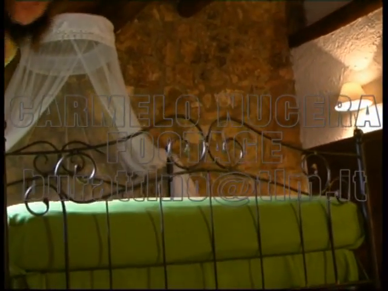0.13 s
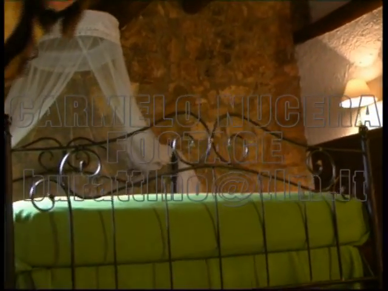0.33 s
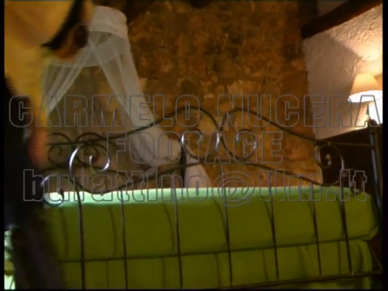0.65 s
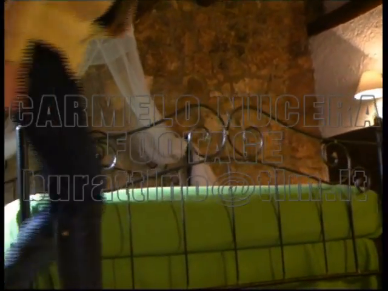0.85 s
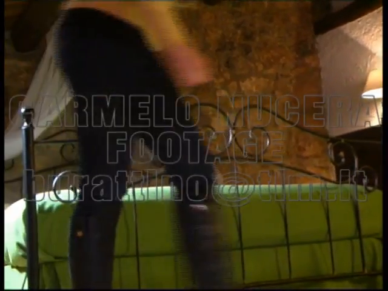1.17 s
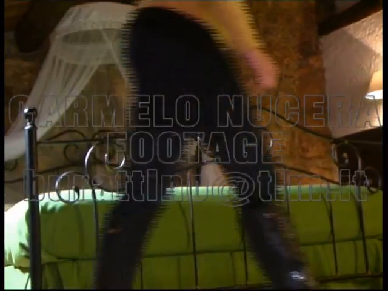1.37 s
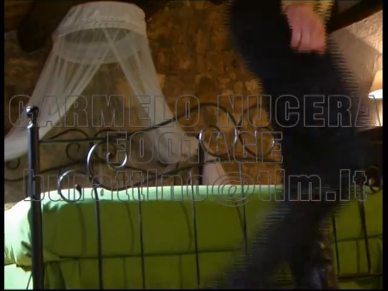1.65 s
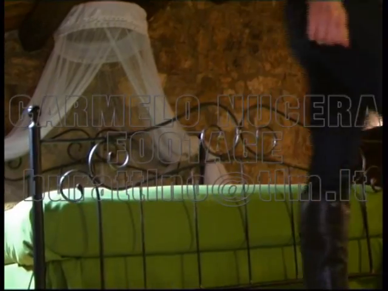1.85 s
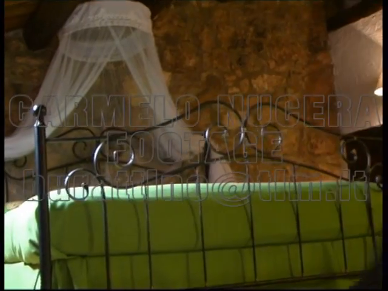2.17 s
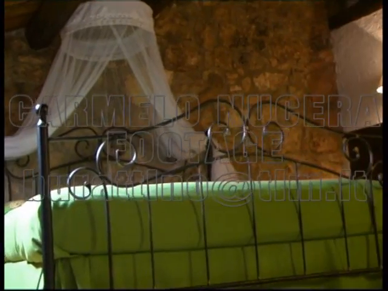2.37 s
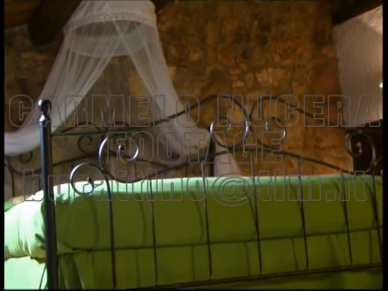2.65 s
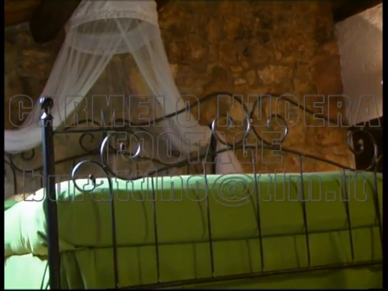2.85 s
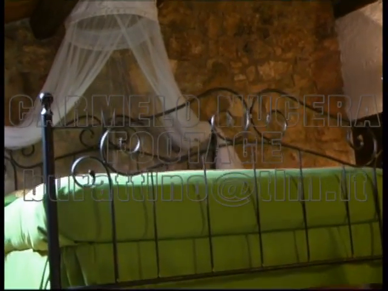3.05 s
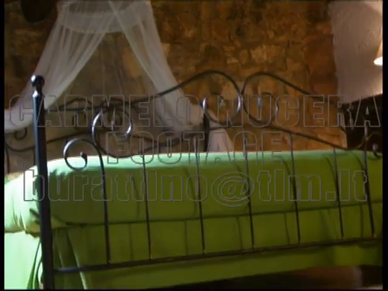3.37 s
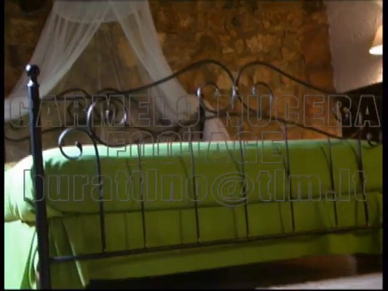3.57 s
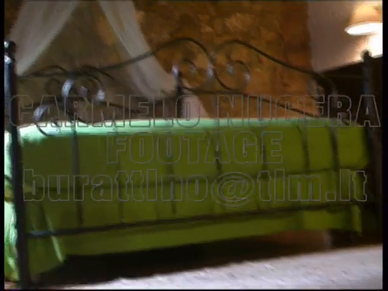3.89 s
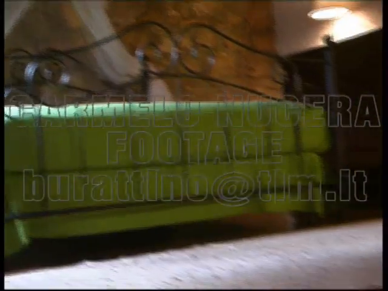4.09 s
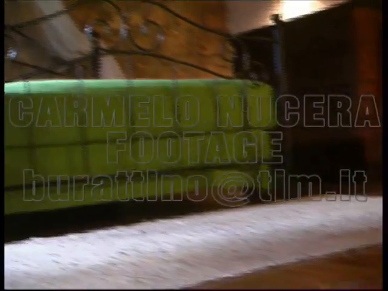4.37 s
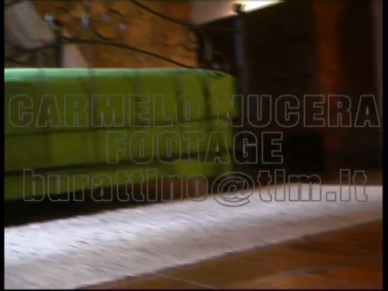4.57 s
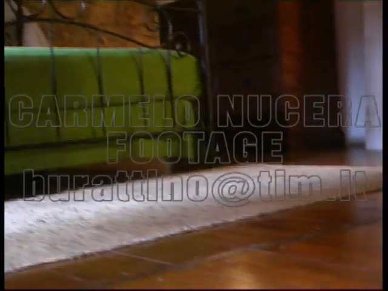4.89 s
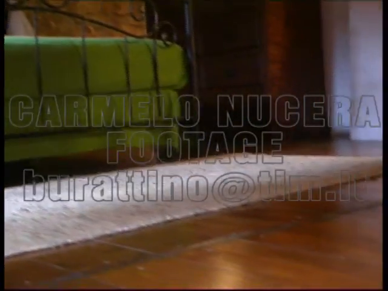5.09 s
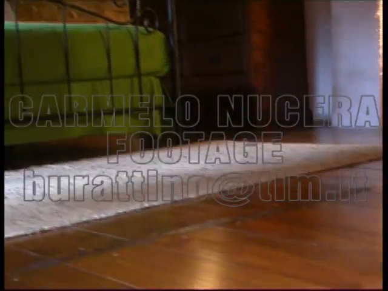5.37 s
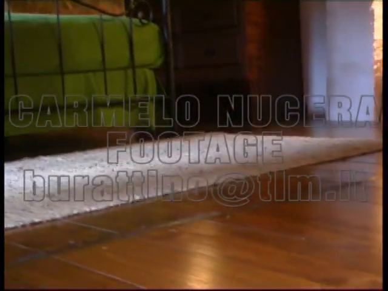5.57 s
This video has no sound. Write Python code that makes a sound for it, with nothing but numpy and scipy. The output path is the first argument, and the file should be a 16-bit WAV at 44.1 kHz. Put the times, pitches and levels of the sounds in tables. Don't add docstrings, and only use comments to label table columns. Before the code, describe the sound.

Slow, uneven boot steps knock on a resonant wooden floor in a live stone room. Early steps shuffle and jingle slightly; the strongest thump and clatter arrives around 2.3 seconds, followed by firm knocks near 3 and 3.7. Later steps are weaker, with scuffs and dull handling bumps at the end. A nearby camera microphone also picks up steady hum and hiss.

```python
import sys
import numpy as np
from scipy import signal
from scipy.fft import rfft, irfft
from scipy.io import wavfile
from scipy.ndimage import map_coordinates

SR = 44100
rng = np.random.default_rng(int(sys.argv[2]) if len(sys.argv) > 2 else 0)


def invert_db(level):
    return 10 ** (np.asarray(level, dtype=float) / 20)


def waveform_to_disk(signal):
    frames = np.transpose(np.atleast_2d(signal))
    scaled = np.clip(frames, -1, 1) * 32767
    samples = np.round(scaled).astype(np.int16)
    wavfile.write(sys.argv[1], SR, samples)


N = 253134
ROOM_RING = 26000

# (pitch [Hz], level [dB])
HUM_TONES = [(150.6, -46), (15622, -100)]
# (frequency [Hz], level per Hz [dB])
AIR_COLOUR = [(20, -44), (60, 9.5), (105, 12), (140, 9.5), (200, 1), (340, -5), (1300, -13), (3000, -15.5),
              (6900, -19), (12400, -25.5), (15700, -30.5)]
# (frequency [Hz], likeness [0-1])
AIR_LIKENESS = [(30, 0.85), (100, 0.9), (300, 0.2), (3000, 0.17), (10500, 0.1), (12300, 0.95)]
# (frequency [Hz], time to fall 60 dB [s])
ROOM_DECAY = [(60, 1), (150, 0.64), (400, 0.65), (1500, 0.48), (4000, 0.33), (10000, 0.19)]
# (frequency [Hz], likeness [0-1])
ROOM_LIKENESS = [(80, 0.88), (170, 0.53), (270, 0.27), (600, 0.46), (2000, 0.028), (10500, 0.39),
                 (12500, 0.29)]
# (delay [s], level [dB])
WALL_ECHO = (.0052, -8.5)
# (time [s], left over right [dB])
WALK_PATH = [(0.0, 2), (1.69, 2.5), (1.95, 7), (2.1, -5), (2.86, -4.5), (5.74, 5.5)]

# (time [s], peak level [dB], deep ring [dB], high knock [dB])
CAMERA_BUMPS = [
    (2.178, -53.5, 17, -29),
    (5.387, -39.5, 8.5, -29),
    (5.435, -43.5, -8, -27),
    (5.508, -47.5, 6, -24),
    (5.706, -42, 9.5, -20),
]
# (pitch [Hz], width [Hz])
CASING_MODES = [(181, 138), (104.6, 42), (374, 660)]

# (middle [s], length [s], cloth level [dB], sole drag level [dB])
LEG_SWINGS = [(0.237, 0.1, -56.5, -59), (0.355, 0.31, -62.5, -52), (0.708, 0.15, -63, -57),
              (1.05, 0.24, -61, -53.5), (1.723, 0.29, -62.5, -57.5), (2.334, 0.38, -67, -74),
              (2.47, .2, -90, -58), (2.626, 0.16, -61, -61), (2.78, 0.28, -62.5, -72),
              (3.065, 0.28, -69, -77), (3.847, 0.17, -60, -54), (4.48, 0.51, -72.5, -66),
              (4.777, 0.38, -63.5, -55), (5.14, 0.43, -65.5, -57)]
# (frequency [Hz], level per Hz [dB])
CLOTH_COLOUR = [(2500, -81), (4000, 0), (5500, 1.5), (8000, -1.5), (11000, -8.5), (15500, -42)]
# (frequency [Hz], level per Hz [dB])
SCUFF_COLOUR = [(250, 0), (600, 8), (1200, 1), (2500, -0.5), (4500, -4.5), (8000, -27)]

# (time [s], peak level [dB], pitch [Hz], width [Hz], room level [dB])
HARD_KNOCKS = [(0.2605, -43, 4900, 2200, -6), (0.502, -60, 5000, 2600, -6), (0.94, -33, 190, 89, 5),
               (1.0446, -46, 2700, 500, -4), (1.5784, -44, 4900, 2200, -6), (2.176, -43.5, 560, 300, -17),
               (2.295, -22.5, 530, 220, 7), (2.982, -31, 940, 477, 8), (5.35, -38, 250, 108, -13),
               (2.2897, -28.5, 4600, 2500, -21), (2.3905, -30, 1660, 600, 11),
               (3.7172, -16.5, 219, 91, -2), (3.7195, -25, 2200, 900, -5), (3.725, -35, 647, 250, 8),
               (4.7834, -38.5, 3020, 1200, -2)]

# (time [s], peak level [dB], favoured pitch [octaves over main mode], focus [dB/octave^2])
BUCKLE_CHINKS = [
    (0.2602, -42, -.05, 42),
    (0.3357, -41.5, 1, 29),
    (0.502, -48.5, -0.097, 15),
    (1.0452, -51, -0.52, 5),
    (1.1393, -55, 0.97, 20),
    (1.5782, -46, -.15, 16),
    (1.7104, -53.5, -.22, 56),
    (1.827, -51, 0.92, 20),
    (3.1364, -54, 1, 24),
    (3.257, -74, .1, 6),
]
# (pitch [Hz], width [Hz])
BUCKLE_MODES = [(5350, 120), (3550, 50), (4640, 110), (9320, 420)]

# (time [s], peak level [dB], favoured pitch [octaves over main mode], focus [dB/octave^2],
# room level [dB])
SOLE_SLAPS = [(0.2475, -36.5, -0.42, 0, -2), (0.3606, -37.5, 0.94, 0.7, 2.5),
              (0.9404, -42.5, 1.4, -1.5, -6), (1.0524, -37.5, -1.45, 11, -9), (1.3882, -31, -0.36, 1.5, -7),
              (1.6492, -30, 0.97, 0.8, -4), (2.2874, -39, 0.93, -4.5, 2), (2.391, -31, 0.22, 5.5, 6.5),
              (2.9796, -49, -1.2, 0.5, 3), (3.0424, -39.5, 1.3, -3, -5.5), (3.0514, -44, .6, 12, -2),
              (3.1118, -35, -0.49, 2, -5.5), (3.7184, -35, -0.59, 0.5, 4.5), (4.4253, -42.5, -1.2, 4, -4.5),
              (4.6331, -46, 1.9, 0.5, 3), (4.9174, -41, -0.71, 1, 1.5), (4.9297, -34, 1.65, 3.5, 1)]
# (time [s], peak level [dB], favoured pitch [octaves over main mode])
TREAD_TICKS = [
    (1.258, -57, -1.1),
    (2.8446, -46.5, -0.25),
    (3.2476, -45, 1.6),
    (3.8384, -34, -1.46),
    (3.895, -44, -0.9),
    (3.938, -45, 1.8),
    (4.2784, -52, 1.3),
]
# (pitch [Hz], width [Hz])
RUBBER_MODES = [(1550, 2230), (836, 1380), (3400, 4200), (7040, 7000)]

# (time [s], peak level [dB], favoured pitch [octaves over main board], focus [dB/octave^2],
# joist level [dB])
HEEL_BLOWS = [(0.134, -42, 1.36, 7.5, -22), (0.243, -22, 1.12, 6.5, -30), (0.341, -31, 1.2, 3.5, -32),
              (0.939, -31.5, 0.02, 16, 1), (0.978, -41, .9, 4, -14), (1.238, -48, 2.5, 7.5, -16),
              (1.611, -24, 0.09, 9, -0.5), (2.287, -10, 1.08, 6.5, -15.5), (2.842, -54, 1.7, 11, -16),
              (2.978, -17, 0.95, 6.5, -40), (3.11, -32.5, 0.77, 1, -1), (3.717, -18, 0.19, 7.5, -48),
              (4.423, -39.5, -0.35, 5.5, -32), (4.633, -28, .5, 18, -22)]
# (time [s], peak level [dB])
HEEL_SHUFFLE = [
    (0.163, -39),
    (0.19, -40.5),
    (0.215, -64),
    (0.642, -54),
]
# (pitch [Hz], width [Hz])
FLOOR_MODES = [(172.8, 167), (106, 136), (301, 305), (522, 610), (795, 385), (1220, 480)]


def along(points, hz):
    f, v = np.transpose(points)
    return np.interp(np.log(hz + 1), np.log(f + 1), v)


def unit(x):
    return x / np.sqrt(np.mean(x ** 2) + 1e-20)


def wobble(rate):
    knots = rng.standard_normal(int(N * rate / SR) + 4)
    return map_coordinates(knots, [np.arange(N) * rate / SR])


def stereo_noise(count, likeness, gain):
    hz, t, z = signal.stft(rng.standard_normal((2, count)), SR, nperseg=512)
    turn = np.arccos(np.clip(along(likeness, hz), -1, 1))[:, None] / 2
    mid = z[0] * np.cos(turn)
    side = z[1] * np.sin(turn)
    shaped = np.array([mid + side, mid - side]) * gain(hz[:, None], t)
    return signal.istft(shaped, SR, nperseg=512)[1][:, :count]


def room_answer(early_db):
    rise_s, early_t60 = 0.0043, 0.082
    t = np.arange(ROOM_RING) / SR
    tail = stereo_noise(ROOM_RING, ROOM_LIKENESS, lambda hz, s: invert_db(-60 * s / along(ROOM_DECAY, hz)))
    build_up = 1 - np.exp(-(t / rise_s) ** 2)
    early = 1 + invert_db(early_db - 60 * t / early_t60)
    tail = tail * build_up * early
    return tail / np.sqrt(np.sum(tail ** 2) / 2)


def mode_rings(modes, order, soft_hz):
    f = np.fft.rfftfreq(8192, 1 / SR)
    contact = 1 / (1 + 1.4j * f / soft_hz - (f / soft_hz) ** 2) ** 2
    rings = [irfft(contact * (1j * f * w / (c * c - f * f + 1j * f * w)) ** order) for c, w in modes]
    rank = np.argsort(np.argsort(np.transpose(modes)[0]))
    return [(-1.) ** (k - rank[0]) * r / np.abs(r).max() for k, r in zip(rank, rings)]


def struck(events, modes, room_db, early_db, smear, order, soft_hz):
    out = np.zeros((2, N + 2 * ROOM_RING))
    t = np.arange(512) / SR
    rings = mode_rings(modes, order, soft_hz)
    for s, db, *others in events:
        blow = invert_db(db) * sum(invert_db(d) * r for d, r in zip([0, *others], rings))
        far_db = sum(others[len(modes) - 1:])
        grit = np.exp(-t / smear) * rng.standard_normal(len(t))
        lean = np.interp(s, *np.transpose(WALK_PATH)) / 2
        for delay, wall_db in [(0, 0), WALL_ECHO]:
            near = blow
            if smear > 1 / SR:
                near = np.convolve(blow, grit / np.linalg.norm(grit))
            sides = invert_db([[wall_db + lean], [wall_db - lean]])
            out[:, round((s + delay) * SR):][:, :len(near)] += near * sides
            grit = grit * np.sign(np.sin(np.arange(len(t)) ** 2))
        reply = signal.fftconvolve(blow[None], room_answer(early_db), axes=1)
        out[:, round(s * SR):][:, :reply.shape[1]] += invert_db(room_db + far_db) * reply
    return out[:, :N]


def favoured(events, modes):
    octaves = np.log2(np.transpose(modes)[0] / modes[0][0])
    rows = []
    for s, db, centre, focus_db, *rest in events:
        fall = np.abs(focus_db) * (octaves - centre) ** 2
        rows.append((s, db - fall[0], *(fall[0] - fall[1:]), *rest))
    return rows


def room_tone():
    def surge(hz, t):
        swell = wobble(3.55)[np.minimum((t * SR).astype(int), N - 1)]
        return invert_db(along(AIR_COLOUR, hz) + 0.2 * (hz < 130) * swell)
    return invert_db(-53.5) * unit(stereo_noise(N, AIR_LIKENESS, surge))


def hum():
    t = np.arange(N) / SR
    swell_db = 0.8 * wobble(6)
    drift = 0.1 * wobble(5)
    tones = sum(invert_db(db + 3 + swell_db) * np.sin(2 * np.pi * hz * t + drift) for hz, db in HUM_TONES)
    return tones * invert_db([[.6], [-.6]])


def handling():
    return struck(CAMERA_BUMPS, CASING_MODES, room_db=-12, early_db=3, smear=1e-6, order=3, soft_hz=1010)


def rubbing(colour):
    noise = stereo_noise(N, ROOM_LIKENESS, lambda hz, t: invert_db(along(colour, hz)))
    lumps_db = wobble(50) + wobble(220)
    return unit(noise * invert_db(lumps_db))


def clothes():
    s, length, cloth_db, scuff_db = np.transpose(LEG_SWINGS)[:, :, None]
    fade_db = 6 * (2 * (np.arange(N) / SR - s) / length) ** 2
    cloth = invert_db(-71) + invert_db(cloth_db - fade_db).sum(axis=0)
    scuff = invert_db(-71.5) + invert_db(scuff_db - fade_db).sum(axis=0)
    return cloth * rubbing(CLOTH_COLOUR) + invert_db(-1.5) * scuff * rubbing(SCUFF_COLOUR)


def knocks():
    total = np.zeros((2, N))
    for s, db, hz, width, room_db in HARD_KNOCKS:
        total -= struck([(s, db, room_db)], [(hz, width)], room_db=1.0, early_db=-1, smear=1e-6,
                        order=2, soft_hz=12100)
    return total


def buckles():
    room_db = -1.5
    chinks = favoured([(*chink, room_db) for chink in BUCKLE_CHINKS], BUCKLE_MODES)
    return invert_db(9.5) * struck(chinks, BUCKLE_MODES, room_db=-0.5, early_db=-4, smear=1e-6,
                             order=1, soft_hz=13000)


def soles():
    focus_db, room_db = -10.5, -3.5
    treads = SOLE_SLAPS + [(*tick, focus_db, room_db) for tick in TREAD_TICKS]
    return invert_db(3.5) * struck(favoured(treads, RUBBER_MODES), RUBBER_MODES, room_db=6.5, early_db=-5.5,
                             smear=0.00069, order=2, soft_hz=13500)


def heel_blows():
    octave, focus_db, shuffle_joist_db = 1.26, 16, -35
    boards = FLOOR_MODES[:1] + FLOOR_MODES[2:]
    blows = HEEL_BLOWS + [(s, db, octave, focus_db, shuffle_joist_db) for s, db in HEEL_SHUFFLE]
    rows = []
    for blow, (s, db, *upper, joist_db) in zip(blows, favoured(blows, boards)):
        rows.append((s, db, joist_db + blow[1] - db, *upper))
    return rows


def heels():
    return -invert_db(-1.0) * struck(heel_blows(), FLOOR_MODES, room_db=2.5, early_db=2.5, smear=1e-6,
                               order=3, soft_hz=1390)


def scene():
    background = room_tone() + hum() + handling()
    boots = buckles() + soles() + heels()
    return background + clothes() + knocks() + boots


def low_pass(x):
    return signal.sosfilt(signal.butter(12, 16320, fs=SR, output="sos"), x)


def record(dry):
    top_hz = 15780
    kept = irfft(rfft(dry) * (np.fft.rfftfreq(N, 1 / SR) < top_hz), N)
    return low_pass(kept)


dry = scene()
out = record(dry)
waveform_to_disk(out)
```